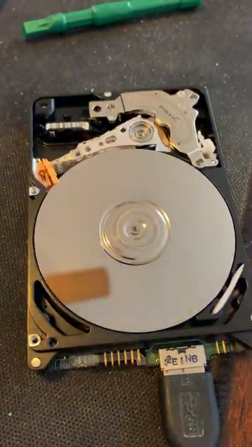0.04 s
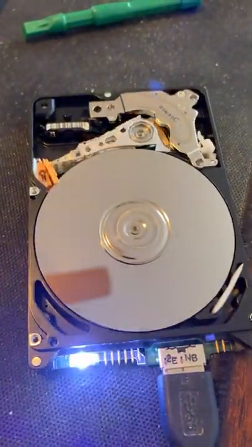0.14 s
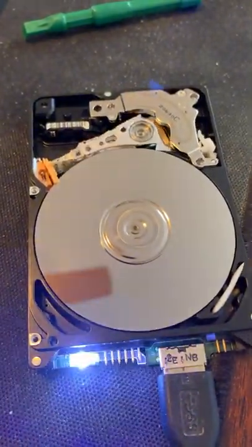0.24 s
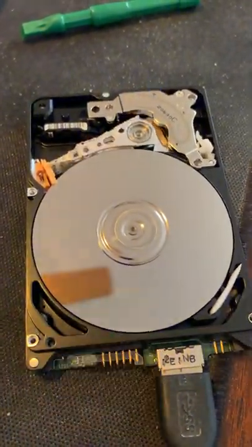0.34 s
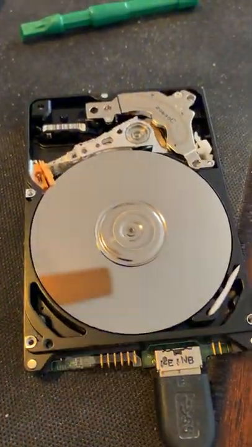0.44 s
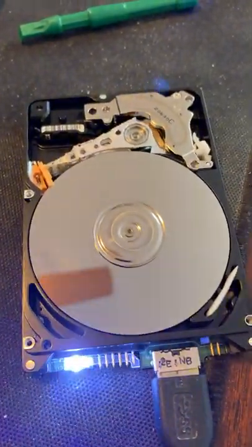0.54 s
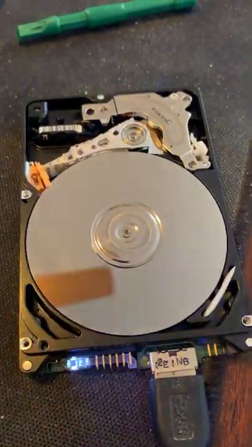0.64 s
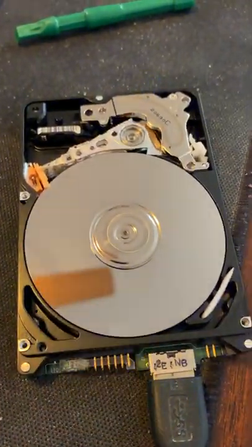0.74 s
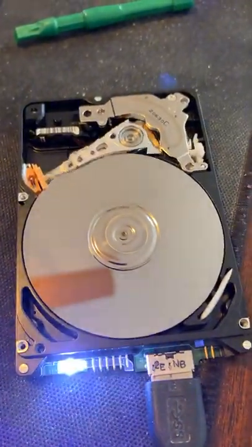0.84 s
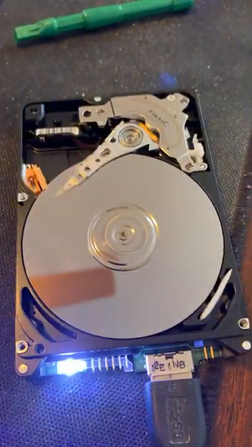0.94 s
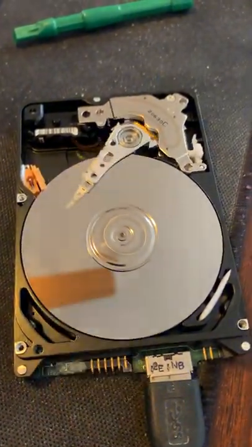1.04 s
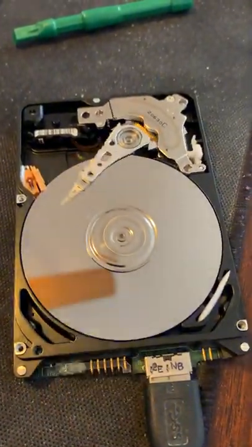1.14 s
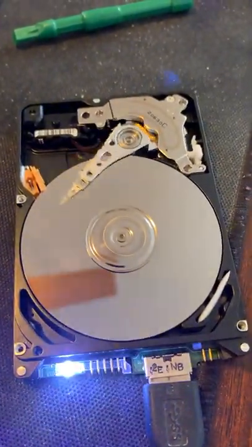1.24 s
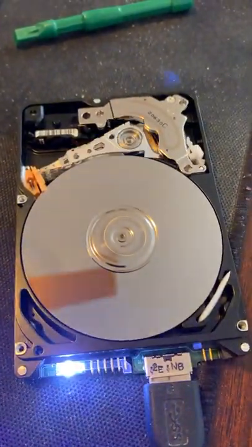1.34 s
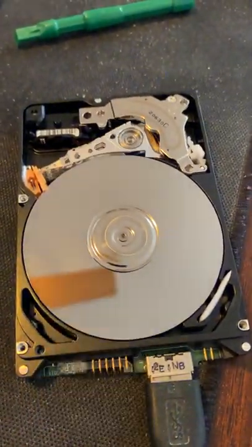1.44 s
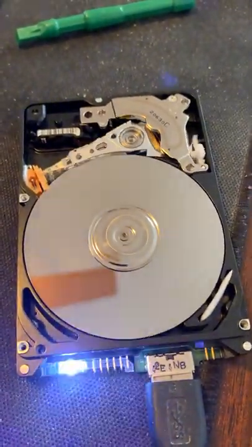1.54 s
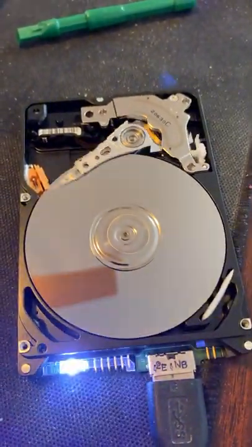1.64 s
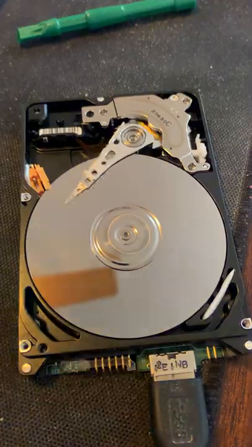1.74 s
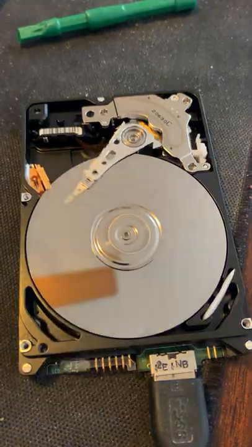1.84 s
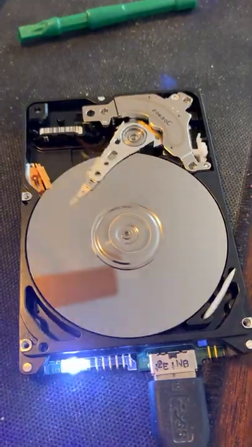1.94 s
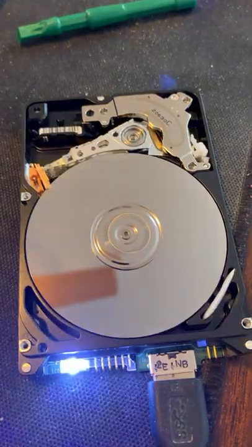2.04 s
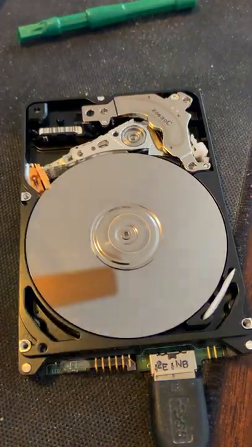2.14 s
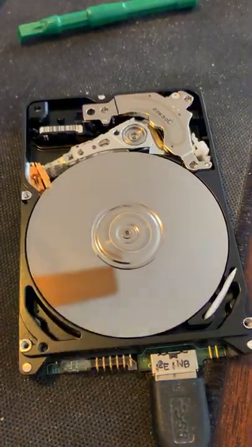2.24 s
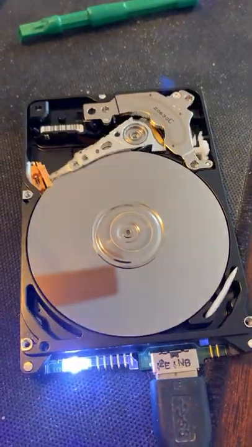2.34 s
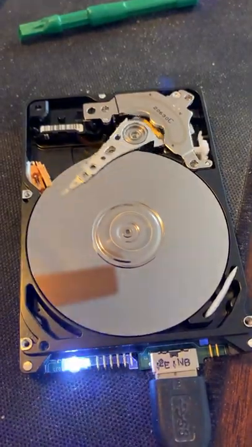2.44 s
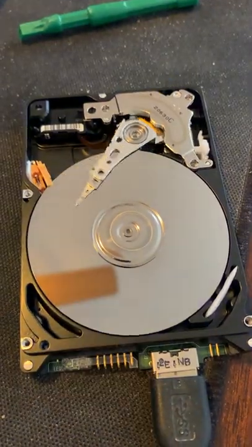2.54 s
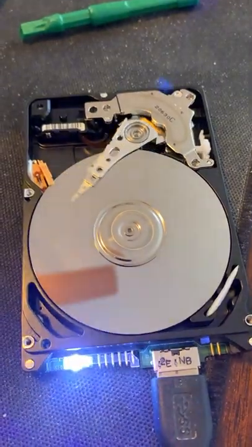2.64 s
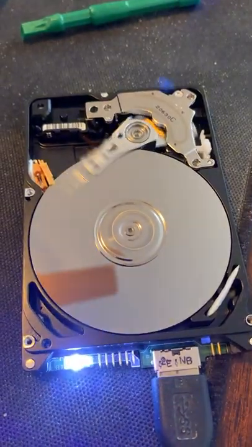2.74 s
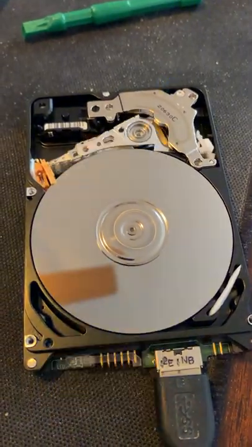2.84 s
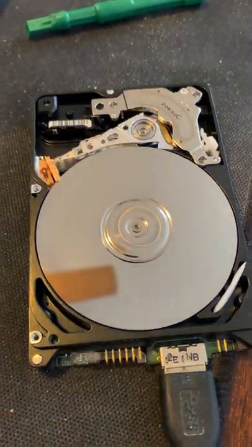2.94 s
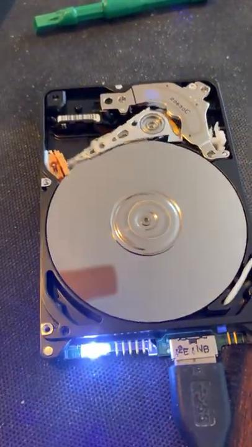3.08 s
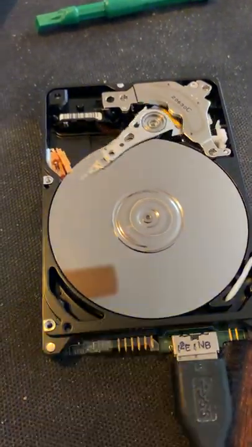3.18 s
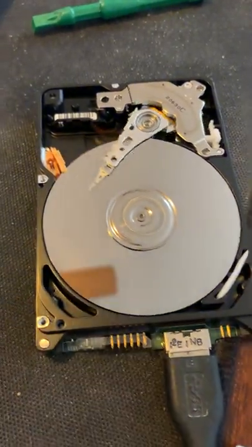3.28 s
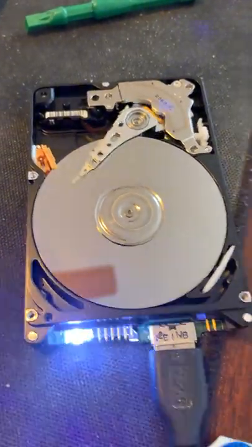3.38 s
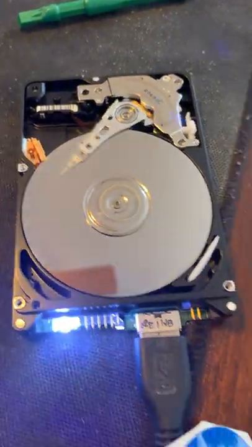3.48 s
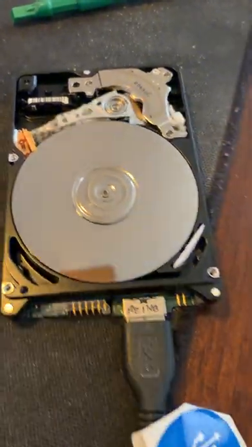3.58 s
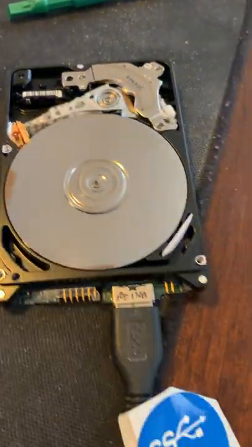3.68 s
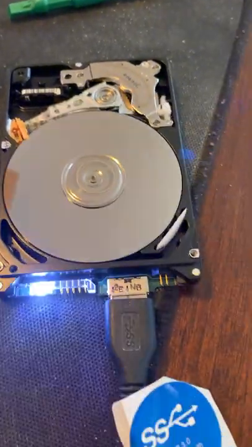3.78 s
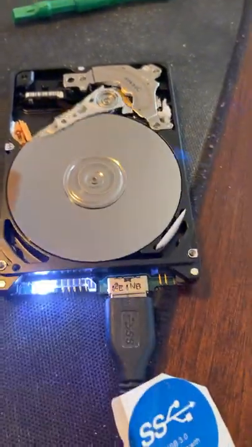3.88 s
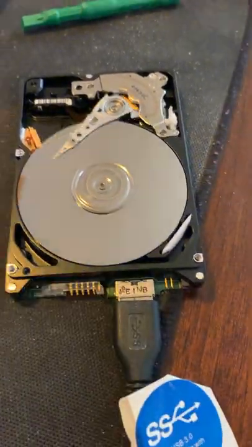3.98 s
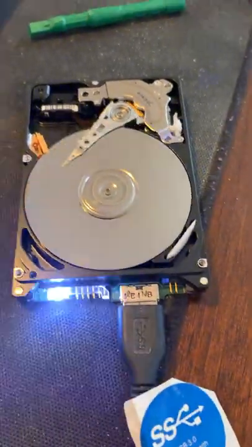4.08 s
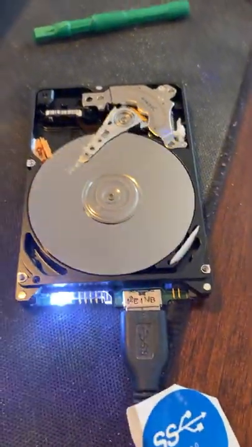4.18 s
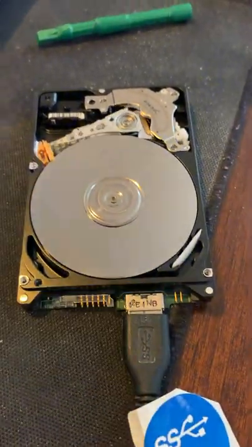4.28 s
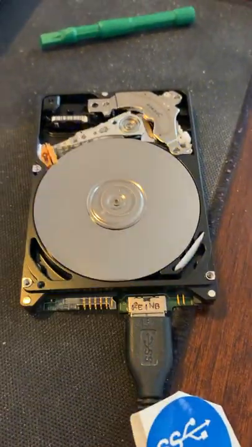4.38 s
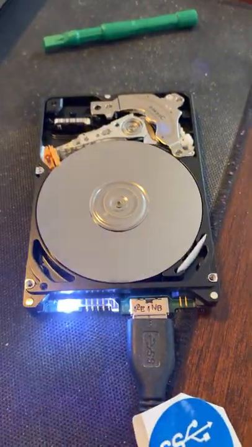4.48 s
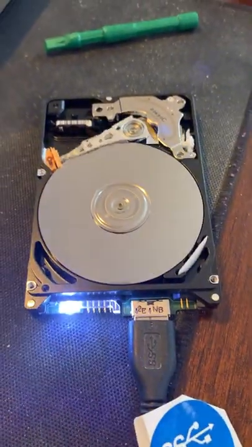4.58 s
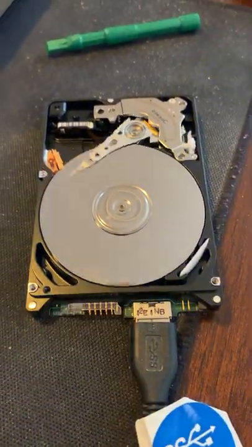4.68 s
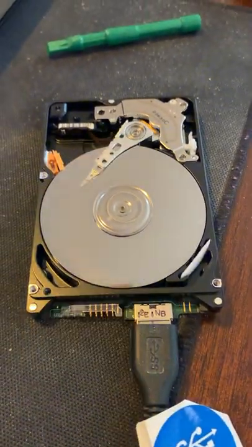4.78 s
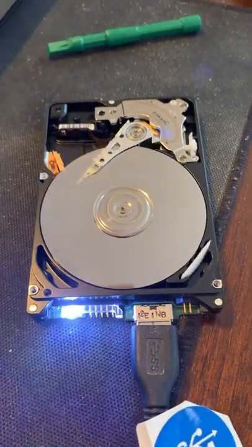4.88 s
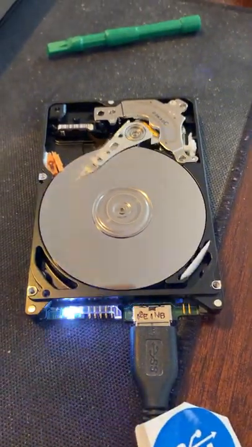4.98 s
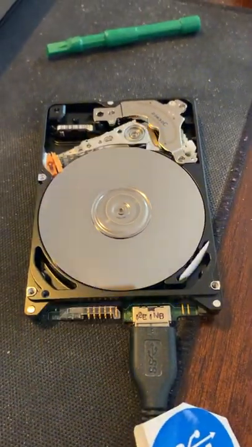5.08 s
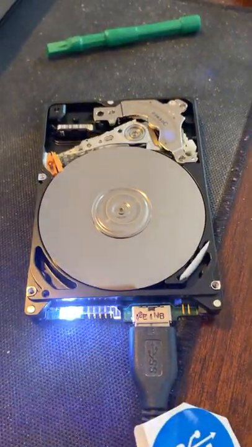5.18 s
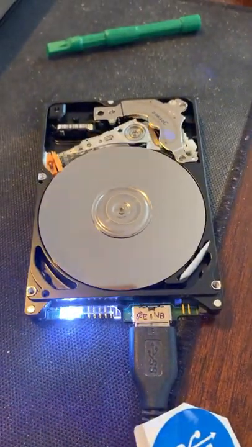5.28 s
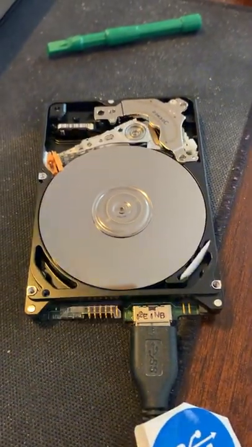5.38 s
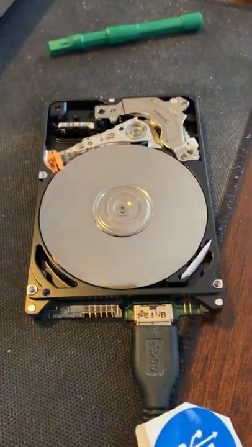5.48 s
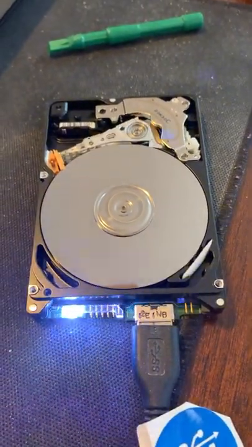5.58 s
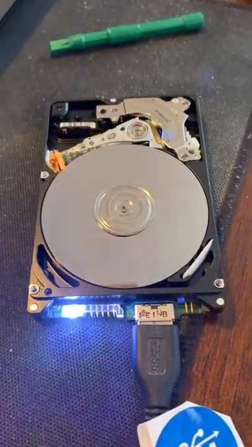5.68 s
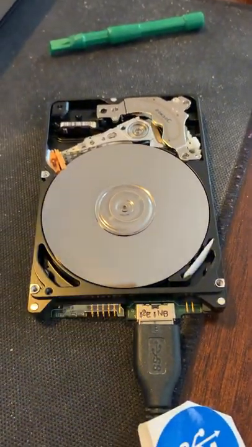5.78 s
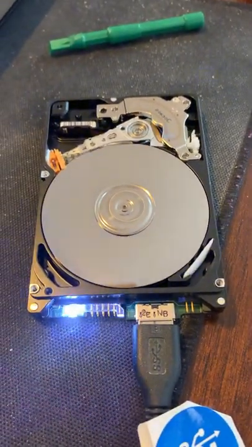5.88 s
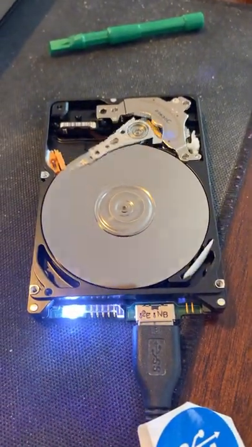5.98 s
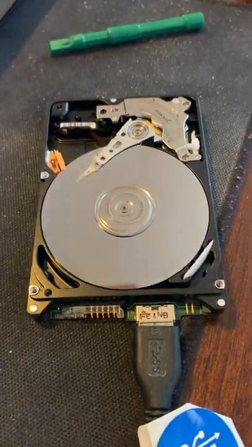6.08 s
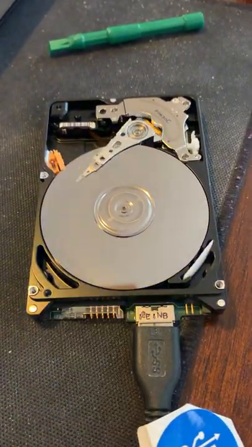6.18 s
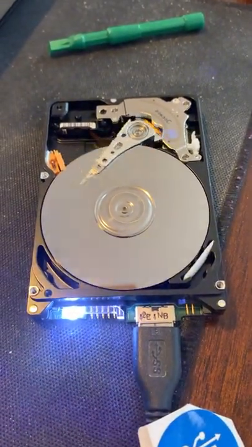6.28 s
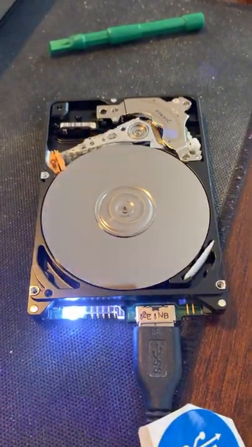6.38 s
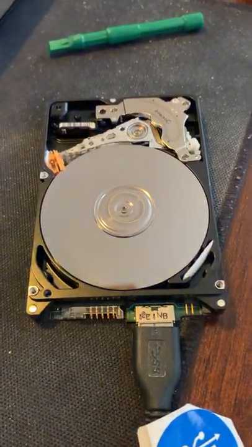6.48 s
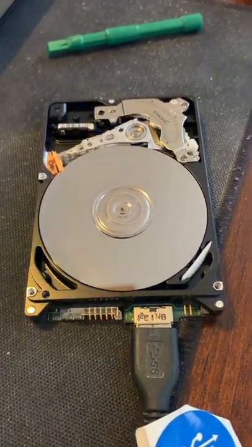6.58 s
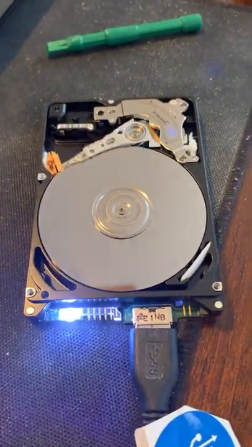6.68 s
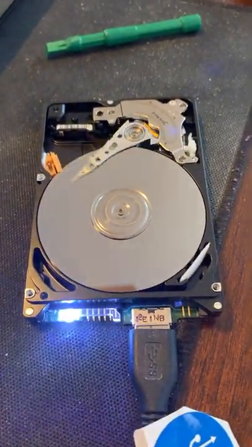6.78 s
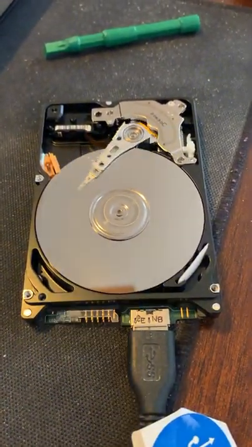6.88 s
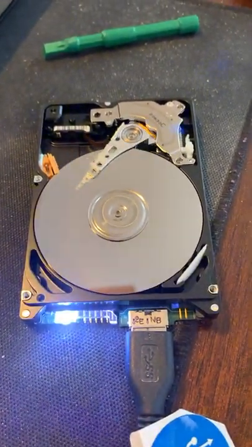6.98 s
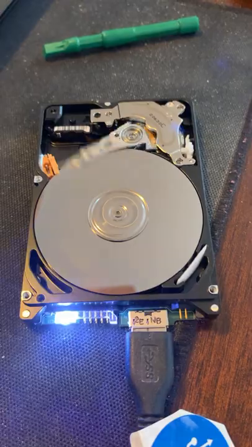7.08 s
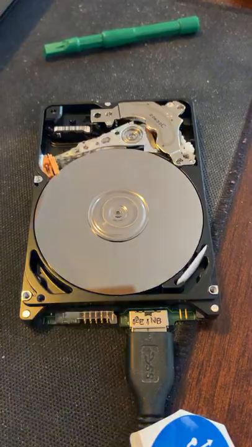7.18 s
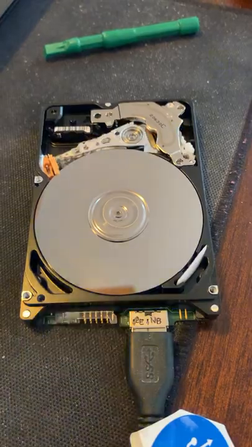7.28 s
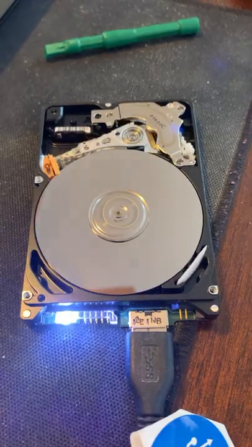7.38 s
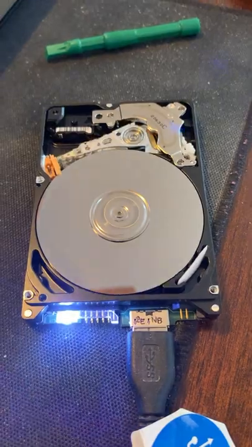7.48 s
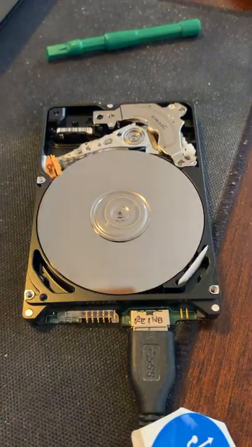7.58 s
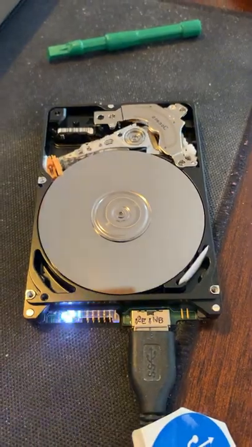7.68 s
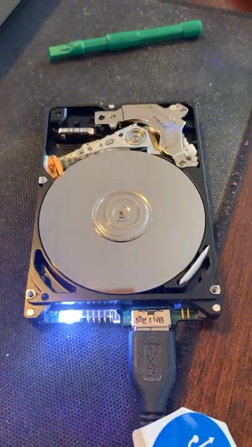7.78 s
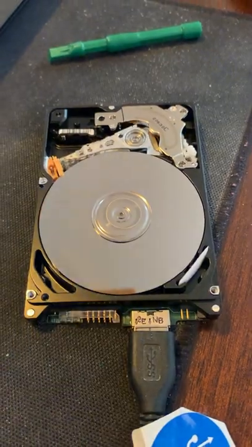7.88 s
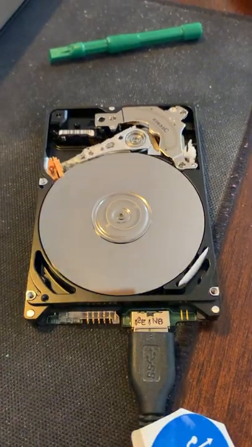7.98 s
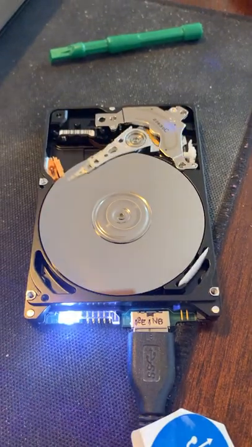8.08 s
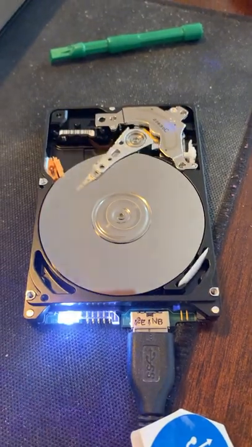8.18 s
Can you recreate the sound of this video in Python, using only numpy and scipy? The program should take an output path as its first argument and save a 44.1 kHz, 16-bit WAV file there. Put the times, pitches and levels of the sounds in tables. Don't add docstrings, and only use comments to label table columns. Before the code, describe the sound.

An opened portable hard drive clicks on a desk, picked up closely by a phone in a quiet room. A sharp, bright metallic slam comes at once, at 0.04 s, followed by a quick hissy ring. A soft false-start tick at 0.4 s brings a brief, very thin high whine; the arm unlatches at 0.9 s and slams at 1.4 s. Further slams fall at 2.1, 2.9, 3.6, 4.35 and 5.1 s, each preceded by a light latch tick about half a second earlier, a fainter drop tick, then rapid ramp ticks and gritty scraping. A muffled distant thud swells at 3.1 s. Another tick and whine at 5.45 s lengthen the gap before slams at 6.4 and 7.2 s. A last false start whines at 7.6 s, and a latch ticks at 8.05 s. Airy platter hiss, dipping during each swing, and low wavering hum continue throughout.

```python
import sys
import numpy as np
from scipy import signal
from scipy.fft import rfft, irfft, next_fast_len
from scipy.io import wavfile
from scipy.ndimage import uniform_filter1d

SR = 44100
rng = np.random.default_rng(int(sys.argv[2]) if len(sys.argv) > 2 else 0)


def convert_level_to_amplitude(level_db):
    exponent = np.asarray(level_db, float) / 20
    return 10 ** exponent


def to_wav(s):
    ch = np.atleast_2d(s).T
    pcm = np.round(np.clip(ch, -1, 1) * 32767)
    wavfile.write(sys.argv[1], SR, pcm.astype(np.int16))


N = 362943
FFT_SIZE = next_fast_len(N)
HZ = np.fft.rfftfreq(FFT_SIZE, 1 / SR)
TIME_S = np.arange(N) / SR

# peak_s, high_modes_db, low_modes_db, mid_modes_db, ramp_ticks_db
SLAMS = [
    (0.043, -5, -29.5, -14, 2),
    (1.37, -4, -34.5, -13, 3),
    (2.113, -5.5, -30, -16, 2),
    (2.8587, -7, -34, -14, 2),
    (3.6056, -4.5, -43, -15.5, 1),
    (4.3535, -6.5, -30.5, -13, -1.5),
    (5.1012, -7, -34.5, -18, -1.5),
    (6.4408, -7.5, -29.5, -13.5, -3.5),
    (7.1861, -6.5, -36.5, -18.5, -2.5),
]
# latch_s, latch_tick_db, ramp_drop_db, air_db
LAUNCHES = [(0.8912, -34.5, -43, 2), (1.637, -34.5, -47, 1.5), (2.3801, -36, -39, 2),
            (3.127, -37, -45, 1.5), (3.874, -36, -55, 0.5), (4.6232, -38, -60, 0),
            (5.962, -36.5, -44.5, -0.5), (6.707, -35.5, -46, 0), (8.0487, -37, -40, -1)]
# tick_s, tick_db, coil_whine_db
RETRIES = [(0.391, -47, -68.5), (5.4496, -47.5, -68), (7.535, -49, -66.5)]
# centre_hz, width_hz, level_db
PLATTER_MODES = [(5827, 250, -3.5), (8080, 120, 9.5), (9100, 350, 3.5), (9340, 300, 5), (10054, 700, 4.5),
                 (12000, 430, -9.5), (13250, 350, -3.5), (14500, 500, -4.5), (6370, 14000, -4.5)]
# low_edge_hz, high_edge_hz
PART_EDGES_HZ = ((1500, 3200), (3050, 7500), (6300, 16500))


def level(x, db):
    return x * convert_level_to_amplitude(db) / np.sqrt(np.mean(x ** 2))


def shape(x, gain):
    return irfft(rfft(x, FFT_SIZE) * gain, FFT_SIZE)[..., :N]


def slope(points):
    hz, db = np.transpose(points)
    return convert_level_to_amplitude(np.interp(np.log(HZ + 1), np.log(hz), db, left=-60, right=-60))


def humps(resonances):
    power = 0
    for hz, width_hz, db in resonances:
        detune = 2 * (HZ - hz) / abs(width_hz)
        power = power + convert_level_to_amplitude(2 * db) / (1 + detune ** 2) ** 2
    return np.sqrt(power)


def pair(gain):
    # pitch_hz, left_right_correlation
    likeness = [(60, .99), (150, .88), (300, .8), (550, .05), (1000, .1), (1400, .93), (3000, .95),
                (4300, .999), (15000, .999)]
    hz, like = np.transpose(likeness)
    like = np.interp(np.log(HZ + 1), np.log(hz), like)
    draw = rng.standard_normal((4, len(HZ)))
    mid = gain * np.sqrt(1 + like) * (draw[0] + 1j * draw[1])
    side = gain * np.sqrt(1 - like) * (draw[2] + 1j * draw[3])
    noise = irfft(np.array([mid + side, mid - side]), FFT_SIZE)[:, :N]
    return level(noise, 0)


def walk(rate_hz):
    hold = int(SR / rate_hz)
    steps = np.repeat(rng.standard_normal(N // hold + 1), hold)
    slewed = uniform_filter1d(uniform_filter1d(steps, hold), hold)
    return 1.3 * slewed[:N]


def microphone_hiss():
    # pitch_hz, density_db_per_hz
    hiss_points = [(4000, -18.5), (6500, -1), (9500, -2), (12000, -7.5), (15600, -12)]
    return convert_level_to_amplitude(-79) * pair(slope(hiss_points))


def hum():
    # pitch_hz, density_db_per_hz
    room_points = [(12, -67.5), (20, -39), (38, -15), (80, -2.5), (141, -12.5), (217, -10.5), (238, -16),
                   (312, -10.5), (480, -19.5), (972, -21), (1500, -22.5), (1950, -48.5), (3300, -120)]
    # pitch_hz, width_hz, level_db
    tones = [(54.65, 7, -72), (89.6, 1.6, -64.5), (211.2, 2, -74), (316.8, 2.8, -74), (370.3, 2.1, -71),
             (423, 16, -88.5)]
    # pitch_hz, width_hz, start_db, end_db
    fading_tone = (113.5, 8, -64.5, -78.5)
    hz, width_hz, start_db, end_db = fading_tone
    fading = convert_level_to_amplitude(np.linspace(start_db, end_db, N)) * pair(humps([(hz, width_hz, 0)]))
    steady = [(f, w, db - 10 * np.log10(abs(w))) for f, w, db in tones]
    room = convert_level_to_amplitude(-62 + 0.23 * walk(0.97)) * pair(slope(room_points))
    return room + fading + convert_level_to_amplitude(-62.5) * pair(humps(steady))


def thud():
    # centre_hz, width_hz, level_db
    thud_modes = [(54.8, 25, 2), (119, 66, 1.5), (180, 170, 1), (386, 136, 1.5), (610, 300, -7),
                  (900, 350, -13)]
    start_s, thud_db, rise_cycles, t60_s = 3.098, -47.5, 1.6, 0.45
    age_s = np.clip(TIME_S - start_s, 0, None)
    total = 0
    for hz, width_hz, db in thud_modes:
        swell = 1 - np.exp(-age_s * hz / rise_cycles)
        total = total + convert_level_to_amplitude(db) * swell * pair(humps([(hz, width_hz, 0)]))
    return convert_level_to_amplitude(thud_db) * 1000. ** (-age_s / t60_s) * total


def air():
    # pitch_hz, density_db_per_hz
    whoosh_points = [(900, -22), (1300, -8.5), (1750, -2), (1950, -5), (2250, -2), (2600, -6.5), (3050, 7),
                     (3450, -3.5), (3900, 2.5), (4400, 0), (5500, -3.5), (6600, -27.5), (9500, -35),
                     (15600, -45)]
    bright_points = [(3000, -12.5), (4500, -2.5), (5900, 1.5), (6400, -0.5), (7700, -7), (8600, -0.5),
                     (9300, -12), (11000, -22), (15600, -37.5)]
    # after_launch_s, whoosh_db, bright_db
    swing = [
        (0, -57, -67),
        (.11, -55, -65),
        (.22, -62, -84),
        (.45, -61, -72),
    ]
    # after_slam_s, whoosh_db, bright_db
    parked = (.14, -57, -66)
    bright_follows = 2.2
    knots = [(0, *swing[-1][1:])]
    for (slam_s, *_), (launch_s, *_, db) in zip(SLAMS, LAUNCHES):
        stages = [(slam_s, parked)] + [(launch_s, row) for row in swing]
        for start_s, (after_s, whoosh_db, bright_db) in stages:
            knots.append((start_s + after_s, whoosh_db + db, bright_db + bright_follows * db))
    knot_s, whoosh_db, bright_db = np.transpose(knots)
    whoosh_gain = convert_level_to_amplitude(np.interp(TIME_S, knot_s, whoosh_db) + 3.5 + 1.3 * walk(25))
    bright_gain = convert_level_to_amplitude(np.interp(TIME_S, knot_s, bright_db) + 0.68 * walk(54))
    return whoosh_gain * pair(slope(whoosh_points)) + bright_gain * pair(slope(bright_points))


def coil():
    # pitch_hz, width_hz, level_db
    whine_tones = [(12350, 100, -10), (12320, 220, -2.5), (13900, 120, -26), (11500, 150, -13),
                   (10200, 220, -16), (9600, 200, -12), (8800, 300, -3)]
    after_s, whine_s = 0.072, 0.172
    steps_s = after_s + whine_s * np.array([0, .28, 1, 1.07])
    gate = sum(convert_level_to_amplitude(db) * np.interp(TIME_S, s + steps_s, [0, 1, 1, 0]) for s, _, db in RETRIES)
    return gate * pair(humps(whine_tones))


def scrape():
    # before_slam_s, dull_db, bright_db
    rub_steps = [(0.045, -68, -83), (0.039, -48, -64), (0.022, -57, -73), (0.013, -49, -54), (0, -47, -49)]
    # centre_hz, width_hz, level_db
    dull_modes = [(1482, 1200, -3), (2250, 67, -5), (3760, 1100, -2.5), (4860, 1300, -7.5)]
    before_s, dull_db, bright_db = np.transpose(rub_steps)

    def gate(db):
        return sum(np.interp(TIME_S, s - before_s, convert_level_to_amplitude(db), left=0, right=0) for s, *_ in SLAMS)

    grit = convert_level_to_amplitude(2.5 * walk(600))
    dull = gate(dull_db) * pair(humps(dull_modes))
    bright = gate(bright_db) * pair(humps(PLATTER_MODES))
    return grit * (dull + bright)


def ticks():
    # before_slam_s, high_db, low_db, mid_db
    climb = [
        (.0406, -54, -51, -42),
        (.0357, -45, -46, -39),
        (.0153, -39, -48, -45),
    ]
    # high_db, low_db, mid_db
    latch_db = (-2.5, -25, -20)
    drop_db = (-14, 0.5, 4.5)
    retry_db = (-0.5, -12, 5.5)
    # peak_s, high_db, low_db, mid_db
    strays = [(0.9625, -73, -53, -41), (1.3595, -34, -38.5, -28), (1.5416, -65, -62, -52),
              (1.8998, -47.5, -58, -40.5), (1.9114, -48, -44, -33.5), (1.9192, -59, -58, -44.5),
              (3.5975, -19, -32.5, -28), (3.8292, -63.5, -66, -41), (4.8912, -74, -69, -40.5),
              (5.0182, -70, -73, -48.5), (5.9164, -66, -61, -47.5), (6.1653, -85, -56, -43.5),
              (6.9063, -80, -65, -47), (7.0995, -67, -66.5, -50)]
    drop_after_s = 0.091
    rows = [(s - before_s, *np.add(colour, db)) for s, *_, db in SLAMS for before_s, *colour in climb]
    rows += [(s, *np.add(latch_db, db)) for s, db, *_ in LAUNCHES]
    rows += [(s + drop_after_s, *np.add(drop_db, db)) for s, _, db, _ in LAUNCHES]
    rows += [(s, *np.add(retry_db, db)) for s, db, _ in RETRIES]
    return rows + strays


def platter_ring():
    # level_db, t60_s
    slam_ring = [
        (-33, 0.027),
        (-39.5, 0.38),
    ]
    # under_tick_db, t60_s
    tick_ring = (-19.5, 0.098)
    stages = [(s, db, t60_s) for s, *_ in SLAMS for db, t60_s in slam_ring]
    stages += [(s, high_db + tick_ring[0], tick_ring[1]) for s, high_db, *_ in ticks()]
    power = np.zeros(N + SR)
    age_s = np.arange(SR) / SR
    for s, db, t60_s in stages:
        at = max(int((s + .002) * SR), 0)
        power[at:at + SR] += convert_level_to_amplitude(2 * db) * 1e6 ** (-age_s / t60_s)
    return np.sqrt(power[:N]) * convert_level_to_amplitude(1.2 * walk(300)) * pair(humps(PLATTER_MODES))


def arm(events, rattle_ms, damping, dull_db):
    # pitch_hz, level_db, t60_s
    low_modes = [(1450, -17, 0.037), (1687, 0, 0.042), (1814, 9.5, 0.015), (2370, -2.5, .022),
                 (2690, -4.5, .012)]
    mid_modes = [(3138, 0, 0.0044), (3566, 0.5, 0.012), (4494, 1, 0.0097), (5070, -4, 0.021),
                 (5488, -5, 0.011), (6360, -4.5, .006)]
    high_modes = [(6630, -10, .009), (8280, 5, 0.01), (8920, -10, .04), (9180, -9, 0.02), (9690, -9, 0.016),
                  (9970, -14.5, .05), (10240, -1, 0.006), (10140, -13.5, 0.041), (10640, -5, 0.0042),
                  (11790, -3.5, 0.0048), (12430, -10.5, 0.011), (13070, -9, 0.008), (13660, -12, 0.008),
                  (14690, -4.5, 0.012)]
    scatter_db, contacts_db = 1.5, 4
    out = np.zeros(N + 4000)
    t = np.arange(1536) / SR
    bands = [signal.butter(4, hz, "band", fs=SR, output="sos") for hz in PART_EDGES_HZ]
    age = (np.arange(800) - 400) / SR * 1000 / rattle_ms
    swell = np.exp(np.where(age < 0, 1.35 * age, -1.1 * age))
    luck = rng.standard_normal((len(events), 900))
    for (s, high_db, low_db, mid_db, *_), row in zip(events, luck):
        rattle = row[:800] * convert_level_to_amplitude(contacts_db * np.roll(row[:800], 7)) * swell
        tone = rfft(rattle)
        rattle = irfft(tone / np.sqrt(uniform_filter1d(np.abs(tone) ** 2, size=17)))
        blow = 0
        groups = ((low_modes, low_db), (mid_modes, mid_db), (high_modes, high_db))
        for k, (modes, db) in enumerate(groups):
            hz, mode_db, t60_s = np.transpose(modes)[:, :, None]
            drive = np.abs(np.exp(2j * np.pi * hz * t[:800]) @ rattle)[:, None]
            drive = drive + .1 * np.linalg.norm(rattle)
            scatter = scatter_db * row[800 + 20 * k:][:len(hz), None]
            gain = convert_level_to_amplitude(mode_db + scatter - dull_db * np.log2(hz / hz[0])) / drive
            sign = (-1.) ** np.arange(len(hz))[:, None]
            decay = 1000. ** (-t * damping / t60_s)
            ring = np.sum(gain * sign * np.sin(2 * np.pi * hz * t) * decay, axis=0)
            part = signal.sosfilt(bands[k], signal.fftconvolve(rattle, ring))
            peak_power = uniform_filter1d(part ** 2, size=40).max()
            blow = blow + part * convert_level_to_amplitude(db) / np.sqrt(2 * peak_power)
        at = int(s * SR) - np.argmax(uniform_filter1d(blow ** 2, size=40))
        out[max(at, 0):at + len(blow)] += blow[max(-at, 0):]
    return out[:N]


def scene():
    soft = 1 / np.sqrt(1 + (HZ / 11500) ** 6)
    slams = arm(SLAMS, rattle_ms=1.05, damping=1, dull_db=0.1)
    light = shape(arm(ticks(), rattle_ms=.6, damping=1.3, dull_db=3), soft)
    thin = 1 / np.sqrt(1 + (PART_EDGES_HZ[0][0] / (HZ + 1)) ** 12)
    metal = shape(scrape() + platter_ring(), thin)
    drive = slams + light + metal + air() + coil()
    return drive + hum() + thud() + microphone_hiss()


def roll_off(x):
    return signal.sosfilt(signal.butter(12, 16960, fs=SR, output="sos"), x)


def record(dry):
    # pitch_hz, left_lead_rad, left_minus_right_db
    ports_table = [(60, 0, 1.5), (380, -.2, 3), (900, 0, 0), (2000, .4, -1.5), (2600, 1.3, -5),
                   (3300, 2.0, -2.5), (3700, 1.6, -.5), (4760, 3.14, 0), (8950, 9.42, 0), (13100, 15.7, 0),
                   (17000, 21.5, 0)]
    top_hz, squeeze = 15750, .6
    hz, lead_rad, tilt_db = np.transpose(ports_table)
    half = convert_level_to_amplitude(np.interp(HZ, hz, tilt_db) / 2) * np.exp(.5j * np.interp(HZ, hz, lead_rad))
    ports = shape(dry, np.array([half, 1 / half]))
    rounded = np.tanh(squeeze * ports) / squeeze
    top = np.clip((top_hz + 150 - HZ) / 150, .008, 1)
    return roll_off(shape(rounded, top))


dry = scene()
out = record(dry)
to_wav(out)
```